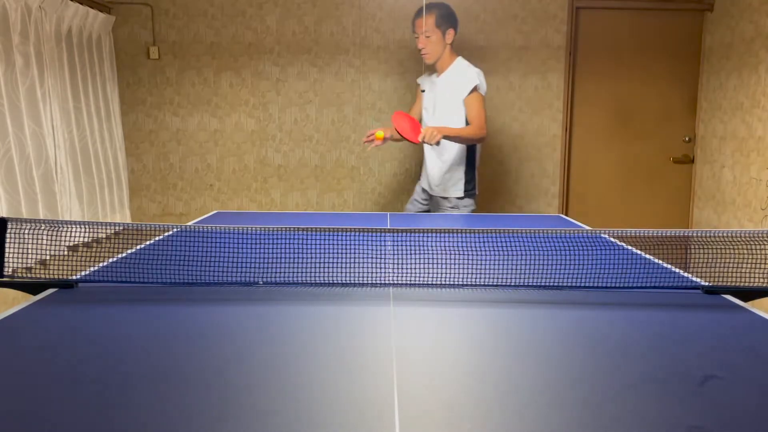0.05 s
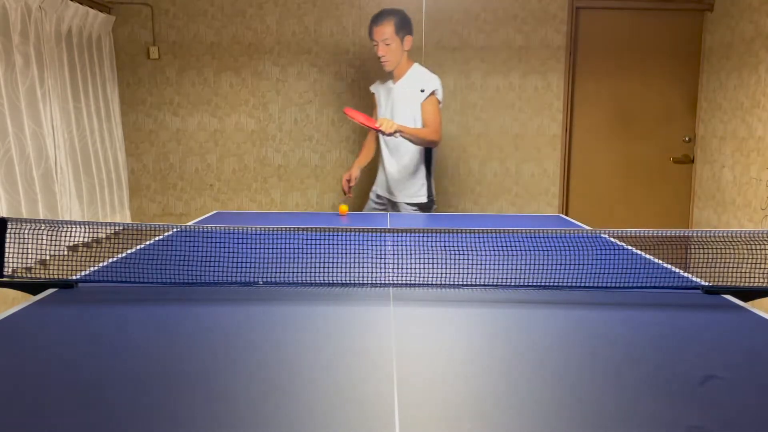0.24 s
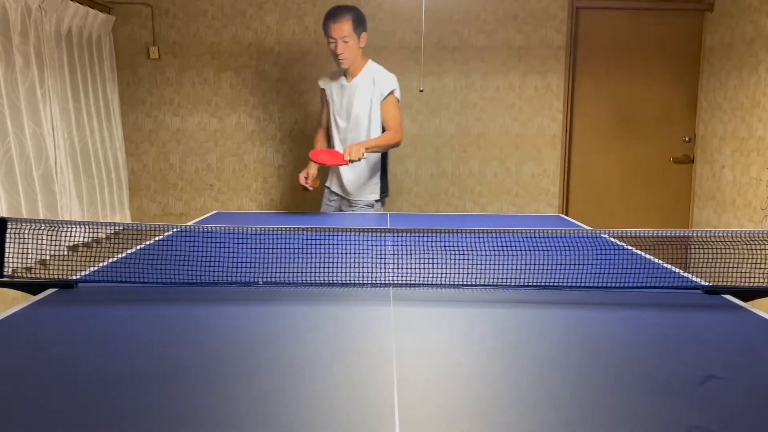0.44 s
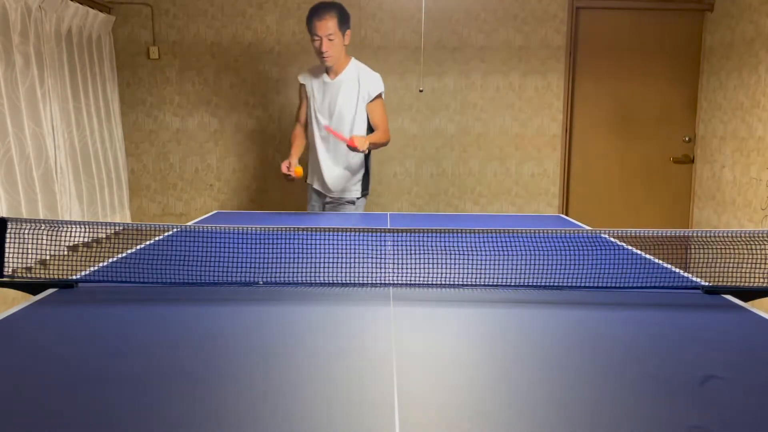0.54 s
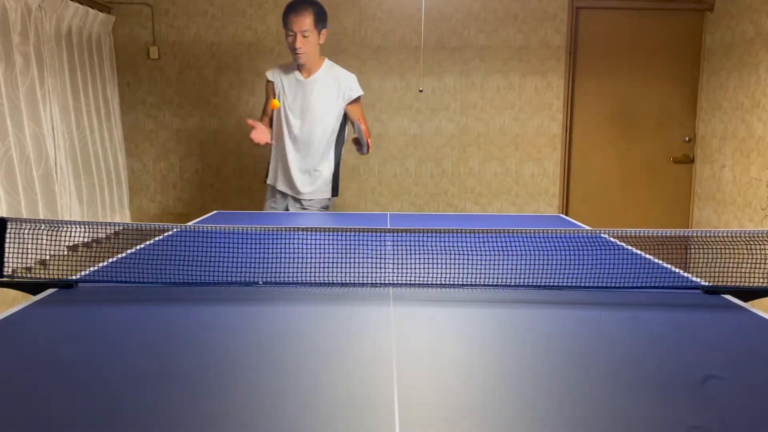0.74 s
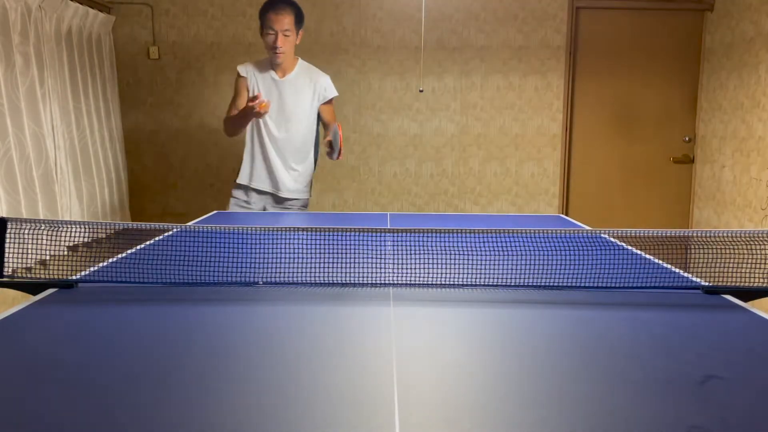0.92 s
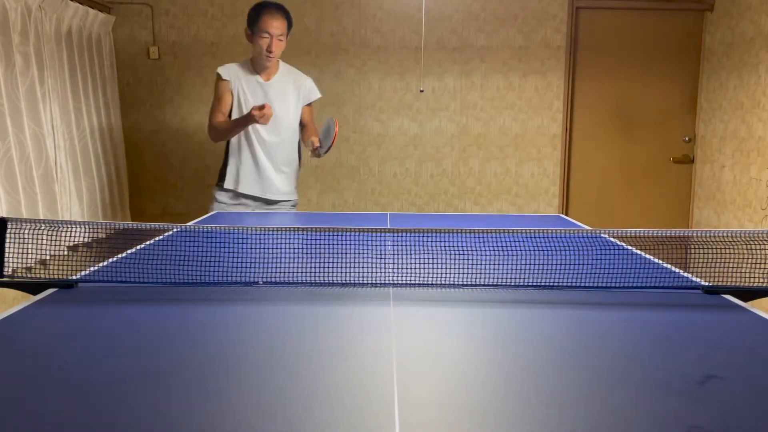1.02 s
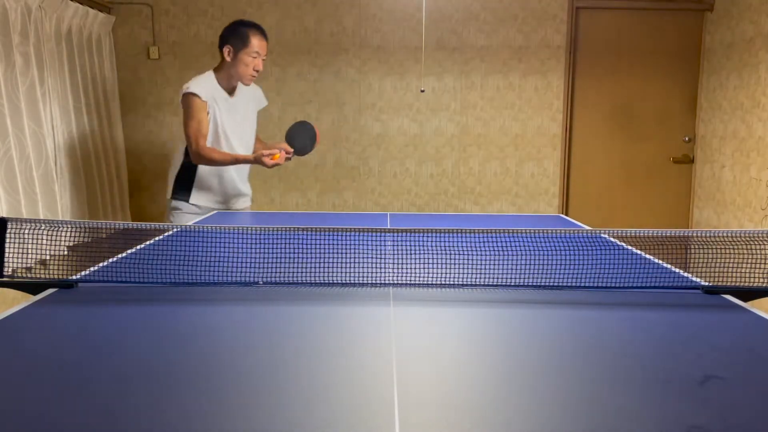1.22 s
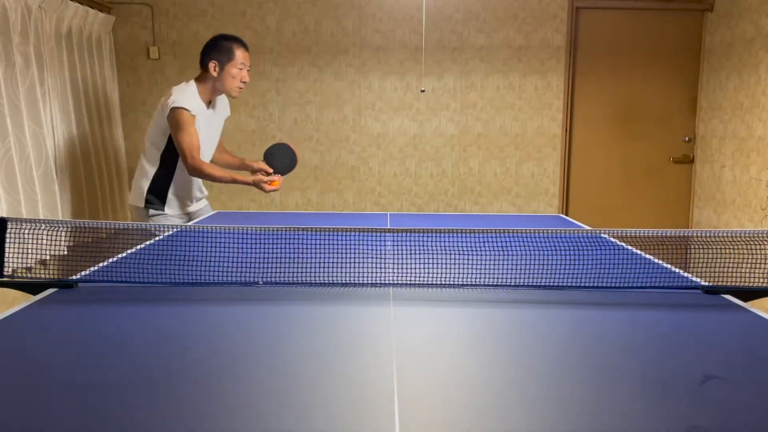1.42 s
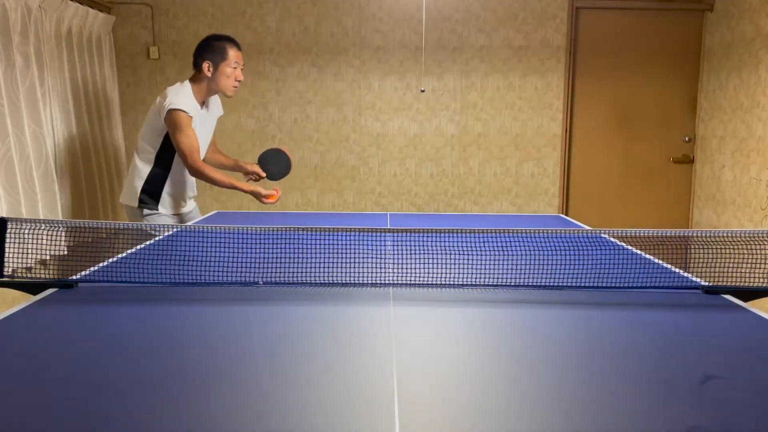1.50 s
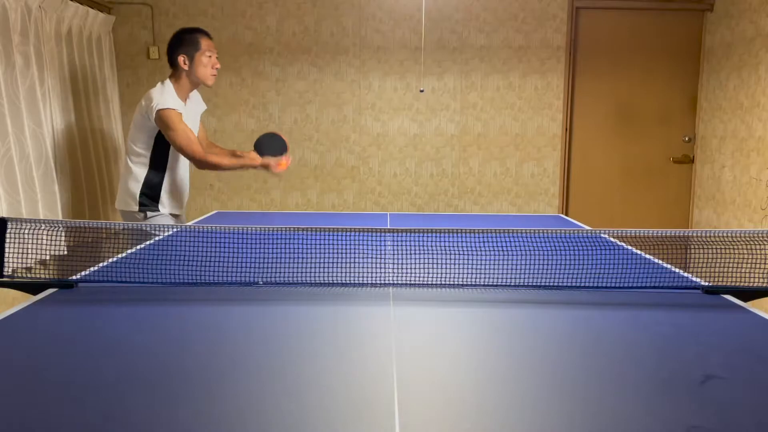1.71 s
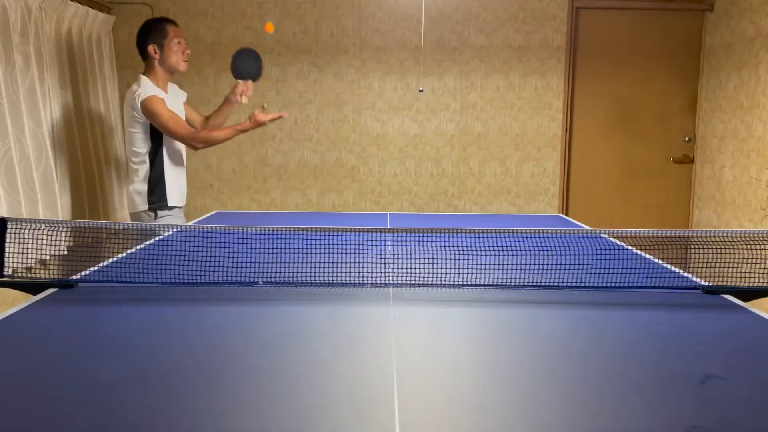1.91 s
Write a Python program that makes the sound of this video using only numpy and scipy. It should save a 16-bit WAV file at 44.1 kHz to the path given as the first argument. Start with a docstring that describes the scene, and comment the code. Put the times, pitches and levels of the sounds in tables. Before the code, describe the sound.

Two sharp bounces of a table tennis ball on a table, then soft clothing rustle.

```python
"""In a small bare room a player's shoe scuffs, his foot lands and his clothes rustle.
A table tennis ball drops on the table, is tapped down with the bat and bounces again.
Each bounce rings the ball's shell and the table top, and the room answers.
The ball is caught with a soft tick. Then the player shifts his stance: clothes rustle,
the floor rumbles and a shoe scuffs once more."""
import sys
import numpy as np
from scipy import signal
from scipy.fft import rfft, irfft
from scipy.io import wavfile
from scipy.ndimage import uniform_filter1d

SR = 44100
rng = np.random.default_rng(int(sys.argv[2]) if len(sys.argv) > 2 else 0)


def wav_record(signal):
    """Record a signal, one row per channel, as 16-bit PCM in the file named by sys.argv[1]."""
    frames = np.transpose(np.atleast_2d(signal))
    bounded = np.clip(frames, -1, 1)
    # unit amplitude maps onto the largest positive 16-bit level
    quanta = np.round(bounded * 32767).astype(np.int16)
    wavfile.write(sys.argv[1], SR, quanta)


N = 85995
TIME = np.arange(N) / SR
FREQS = np.maximum(np.arange(N // 2 + 1) * SR / N, 1)


def from_db(db):
    """Turn decibels into a gain to multiply by."""
    return 10 ** (np.asarray(db) / 20)


def read_curve(table, column=1):
    """Join a table's rows smoothly, giving a value for every frequency."""
    rows = np.array(table)
    return np.interp(np.log(FREQS), np.log(rows[:, 0]), rows[:, column])


def colour(table):
    """A sound's balance of bass and treble, as gains with an average power of one."""
    gain = from_db(read_curve(table))
    return gain / np.sqrt(np.mean(gain ** 2))


def decay(start, t60, rise=0.0002):
    """A straight rise, then a fade. The fade time t60 is the seconds it takes to drop 60 dB."""
    age = np.maximum(TIME - start, 0)
    return np.minimum(age / rise, 1) * np.exp(-np.minimum(np.log(1000) * age / t60, 50))


def ring(start, hz, t60, rise=0.00034):
    """One fading tone of a struck object."""
    return np.sin(2 * np.pi * hz * (TIME - start)) * decay(start, t60, rise)


# The stereo image by frequency. Each row: frequency in Hz, how alike left and right are
# from 0 to 1, left's lead in radians, left minus right in dB.
STEREO_IMAGE = [(99.4, 0.98, 0, 0), (352, 0.67, 0, -0.5), (757, 0.35, 0.56, -.3), (1170, 0.16, 0.36, 0.5),
                (1700, 0.42, 0.2, 0.7), (2900, 0.5, 1.2, 1.8), (4300, 0.67, 1.33, 3), (6300, 0, -0.87, 1.5),
                (7640, 0.91, -2.5, 3), (8960, 1, -3.5, -1.5), (9980, 0.85, -4, -1.7),
                (11100, 0.5, -4.5, 1.2), (12300, 1, -6, -1.5), (15000, .95, -7.5, 1)]
def diffuse(gain):
    """Shaped stereo noise, wide in the middle range, nearly mono in the bass and the top treble."""
    alike = np.clip(read_curve(STEREO_IMAGE), 0, 1)
    mid, side = rfft(rng.standard_normal((2, N)))
    shared = np.sqrt((1 + alike) / 2) * mid
    opposed = np.sqrt((1 - alike) / 2) * side * [[1], [-1]]
    return irfft(gain * (shared + opposed), N)


# The room's background hush. Each row: frequency in Hz, relative level in dB.
AIR_COLOUR = [(71, -61), (120, -2), (278, -3), (334, -2.5), (410, -2), (1580, -3.5), (7980, -26.5),
              (8660, -40), (9590, -26.5), (16000, -37)]
def room_air():
    """The air in the room makes a faint, steady noise."""
    return from_db(-60) * diffuse(colour(AIR_COLOUR))


# The room's echo. Each row: frequency in Hz, fade time in seconds, build-up in seconds.
ROOM_BANDS = [(200, 0.45, 0.016), (450, .37, 0.0028), (1000, 0.47, 0.00079), (2500, 0.44, 0.0005),
              (6000, 0.42, 0.00054)]
def room_tail(start, gain):
    """Many reflections blur together; each frequency range builds up and dies at its own rate."""
    spectrum = rfft(diffuse(gain))
    centres = np.log([row[0] for row in ROOM_BANDS])
    tail = 0
    for one_band, (_, t60, rise) in zip(np.eye(len(centres)), ROOM_BANDS):
        band_gain = np.interp(np.log(FREQS), centres, one_band)
        tail += irfft(spectrum * band_gain, N) * decay(start, t60, rise)
    return tail


# How loud the floor is. Each row: time in seconds, level in dB.
RUMBLE_LEVELS = [(0, -55), (0.08, -62.5), (0.15, -57), (0.216, -72), (0.28, -46), (0.35, -45), (0.45, -64),
                 (0.51, -58.5), (0.545, -42.5), (0.64, -56), (0.81, -59), (0.87, -65), (0.965, -71),
                 (1.0, -54.5), (1.125, -50), (1.19, -52.5), (1.39, -64.5), (1.54, -55), (1.69, -63),
                 (1.95, -68)]
# The floor's deep tone. Each row: frequency in Hz, relative level in dB.
FLOOR_COLOUR = [(20, -41.5), (35, -26.5), (55, -1), (80, 0), (110, -2), (150, -14), (250, -18), (600, -47)]
def floor_rumble():
    """The floor gives a low rumble that swells and sinks."""
    level_db = np.interp(TIME, *np.transpose(RUMBLE_LEVELS))
    return diffuse(colour(FLOOR_COLOUR)) * from_db(level_db)


# Shoes landing, and shoes scraping. Each row: start, rise time and fade time in seconds,
# centre frequency in Hz, level in dB.
FOOTFALLS = [(0.105, 0.011, 0.23, 313, -43.5), (0.11, 0.014, 0.29, 114, -41.5),
             (0.991, 0.011, .25, 98, -57), (1.055, .05, 0.27, 103, -49), (1.443, 0.0016, 0.095, 94, -51)]
SHOE_SCUFFS = [(0.039, 0.016, 0.51, 628, -54), (1.504, 0.024, 0.71, 2800, -53.5)]
def feet(half_width_octaves=0.42):
    """Shoes on the floor make bursts of noise: low for a footfall, higher for a scuff."""
    sound = 0
    for start, rise, t60, hz, db in FOOTFALLS + SHOE_SCUFFS:
        band = 1 / (1 + (np.log2(FREQS / hz) / half_width_octaves) ** 4)
        band /= np.sqrt(np.mean(band ** 2))
        sound += from_db(db) * diffuse(band) * decay(start, t60, rise)
    return sound


# How loud the clothes are. Each row: time in seconds, level in dB.
RUSTLE_LEVELS = [(0, -104), (0.07, -72.5), (0.15, -59), (0.23, -61), (0.6, -73), (0.79, -61.5), (0.86, -80),
                 (0.98, -69.5), (1.06, -67), (1.15, -63), (1.22, -58.5), (1.295, -51), (1.39, -56),
                 (1.48, -62), (1.6, -50), (1.68, -54.5), (1.77, -60.5), (1.87, -76.5), (1.95, -80.5)]
# The hiss of fabric. Each row: frequency in Hz, relative level in dB.
FABRIC_COLOUR = [(300, -12.5), (1000, -5.5), (2000, -2), (3200, 0), (4500, -2), (6000, -3), (8500, -4),
                 (11500, -0.5), (14000, -5), (15800, -12.5)]
def clothes():
    """Sliding fabric hisses with a fine, uneven grain of about 1 dB."""
    grain = uniform_filter1d(rng.standard_normal(N), size=180)
    level_db = np.interp(TIME, *np.transpose(RUSTLE_LEVELS)) + grain / grain.std()
    return diffuse(colour(FABRIC_COLOUR)) * from_db(level_db)


# The ball's tick, and the echo of the bat's blade. Each row: frequency in Hz, relative level in dB.
TICK_COLOUR = [(1500, -19), (3200, -11.5), (4200, -21.5), (6800, -22), (8100, 8), (8900, -6), (9900, 7.5),
               (11000, -1.5), (13000, -9.5), (15500, -23)]
BLADE_COLOUR = [(300, -16.5), (650, -21.5), (760, -13.5), (850, 8.5), (960, -11.5), (1600, -15.5),
                (3000, -31.5), (6000, -42.5)]
# The ball meets the bat twice, then the hand. Each row: start in seconds, tick and blade gains in dB.
BALL_TOUCHES = [(0.4065, -40, -68), (0.4102, -36, -38.5), (0.8828, -38.5, -87)]
SHELL_ECHO_T60_S = 0.38
def touch(start, tick_db, blade_db):
    """A soft contact: the ball's shell ticks thinly, and the bat's blade hums if it is hit."""
    tick_echo = from_db(-12.5) * decay(start, SHELL_ECHO_T60_S)
    tick_fade = np.hypot(decay(start, t60=0.021), tick_echo)  # hypot adds their powers
    tick = diffuse(colour(TICK_COLOUR)) * tick_fade
    hum = ring(start, hz=846, t60=0.66)
    hum_echo = from_db(1.5) * room_tail(start, colour(BLADE_COLOUR))
    return from_db(tick_db) * tick + from_db(blade_db) * (hum + hum_echo)


# The table top's own tones. Each row: frequency in Hz, fade time in seconds,
# level in dB in the first bounce and in the second.
TABLE_TONES = [(207.3, 0.13, -33.5, -45), (338.7, 0.23, -29, -27.5), (376, 0.26, -32.5, -31),
               (422.3, 0.4, -37, -31.5), (536.5, 0.38, -39, -33), (562, 0.1, -26.5, -44),
               (664.4, 0.21, -34, -27.5), (763, 0.076, -44, -19.5), (851, 0.35, -32.5, -32),
               (947.5, 0.23, -34, -31.5), (1037, 0.11, -56, -42), (1160, 0.16, -37, -26),
               (1483, 0.34, -50, -34), (1642, 0.32, -45, -40), (1924, 0.22, -39.5, -58),
               (2632, 0.34, -46, -46.5)]
# The board's knock, one list per bounce. Each row: frequency in Hz, relative level in dB.
KNOCK_COLOURS = [
    [(100, -51), (170, -11), (263, -10.5), (327, -3.5), (432, -4), (505, 0), (554, -6), (844, -4),
     (912, -9.5), (1150, -5.5), (2390, -18.5), (3270, -18), (5460, -27), (7000, -26), (9100, -55),
     (15400, -120)],
    [(100, -44), (170, -15.5), (332, 0.5), (581, -9.5), (844, -4), (912, -7), (1020, -6.5), (1350, -11),
     (1480, -8), (2510, -18.5), (3270, -19.5), (5210, -24.5), (5630, -31.5), (7000, -23), (9100, -57),
     (15400, -120)],
]
def table_top(start, bounce, knock_db, crack_db, bend_db, build_cycles):
    """A bending wave arrives first, the contact cracks, then the board rings and knocks in the room."""
    bend = from_db(bend_db) * ring(start - 0.001194, hz=2306, t60=0.0067)
    crack = from_db(crack_db) * ring(start, hz=3130, t60=0.0016)
    tones = 0
    for k, (hz, t60, *levels_db) in enumerate(TABLE_TONES):
        lag_s = rng.uniform(0, 0.001358)
        tone = ring(start + lag_s, hz, t60, rise=build_cycles / hz)
        tones += (-1) ** k * from_db(levels_db[bounce]) * tone  # every other tone is flipped
    knock = from_db(knock_db) * room_tail(start, colour(KNOCK_COLOURS[bounce]))
    return bend + crack + tones + knock


# The shell's snap. Each row: frequency in Hz, relative level in dB.
SNAP_COLOUR = [(1000, -55), (3000, -10.5), (5500, 5), (8000, -12), (10000, 15), (13000, -3), (16000, -4)]
# The shell's own tones. Each row: frequency in Hz, width of its echo in Hz,
# relative level in dB in the first bounce and in the second.
SHELL_TONES = [(3270, 240, -9.5, -8), (7940, 234, 4, -4), (8060, 160, -23, 9.5), (9390, 990, -2.5, -37),
               (9400, 380, -14, 4), (10040, 190, -16, 1), (10770, 600, -4, -26), (10650, 1300, -24, -9.5),
               (11120, 510, -8, -9), (13000, 650, -16, -12), (13840, 350, -25, -27), (14400, 700, -25, -39)]
def ball_shell(start, bounce):
    """The shell snaps and rings on faintly; its tones come back from the table, then the walls."""
    snap_fade = decay(start + 0.00036, t60=0.0029, rise=0.0001)
    snap = from_db(-21.5) * diffuse(colour(SNAP_COLOUR)) * snap_fade
    tones = echo_power = 0
    for hz, width_hz, *levels_db in SHELL_TONES:
        gain = from_db(levels_db[bounce])
        click = from_db(-27.5) * ring(start, hz, t60=0.0019)
        faint_ring = from_db(-38) * ring(start, hz, t60=0.33)
        tones += gain * (click + faint_ring)
        echo_power += (gain / (1 + 2 * ((FREQS - hz) / width_hz) ** 2)) ** 2
    off_table = from_db(-8) * decay(start - 0.001, t60=0.079, rise=0.0025)
    off_walls = from_db(-19) * decay(start, SHELL_ECHO_T60_S)
    echo = diffuse(np.sqrt(echo_power)) * np.hypot(off_table, off_walls)
    return snap + tones + echo


# The ball hits the table. Each row: start in seconds, gains in dB for the shell, knock, crack
# and bending wave, then the number of cycles the table's tones take to build up.
BALL_BOUNCES = [(0.2476, -0.5, -25, -8.5, -24.5, 1.1), (0.4882, 1, -22, -6.5, -13, 0.91)]
def bounces():
    """Each bounce shakes the ball's shell and the table top together."""
    sound = 0
    for bounce, (start, shell_db, *table_settings) in enumerate(BALL_BOUNCES):
        sound += from_db(shell_db) * ball_shell(start, bounce)
        sound += table_top(start, bounce, *table_settings)
    return sound


def scene():
    """The ball, the player's movements and the room's quiet air, added together."""
    ball = bounces() + sum(touch(*row) for row in BALL_TOUCHES)
    return ball + clothes() + floor_rumble() + feet() + room_air()


def record(dry, cutoff_hz=16000):
    """Left and right get slightly different timing and level; the highest treble is cut."""
    lead, balance_db = read_curve(STEREO_IMAGE, column=2), read_curve(STEREO_IMAGE, column=3)
    balance = from_db(balance_db * [[0.5], [-0.5]])
    left_shift = np.exp(1j * lead * [[1], [0]])
    stereo = irfft(rfft(dry) * balance * left_shift, N)
    low_pass = signal.ellip(10, 0.2, 80, cutoff_hz, fs=SR, output="sos")
    return signal.sosfilt(low_pass, stereo)


dry = scene()
out = record(dry)
wav_record(out)
```